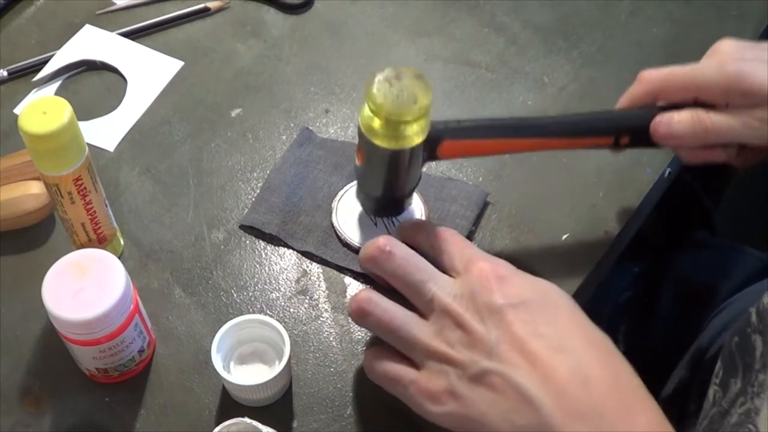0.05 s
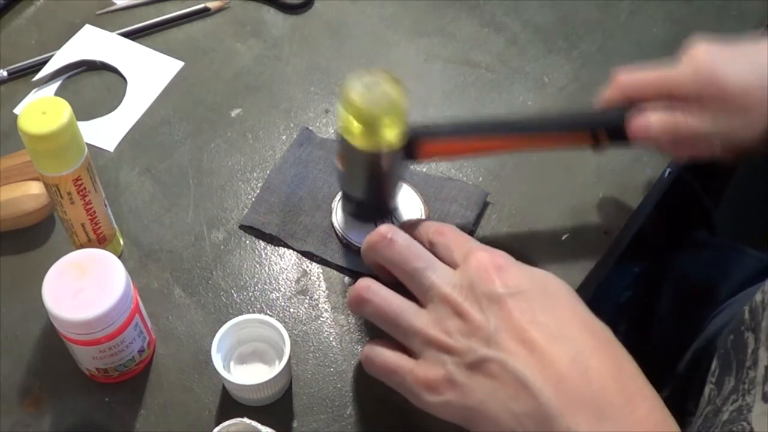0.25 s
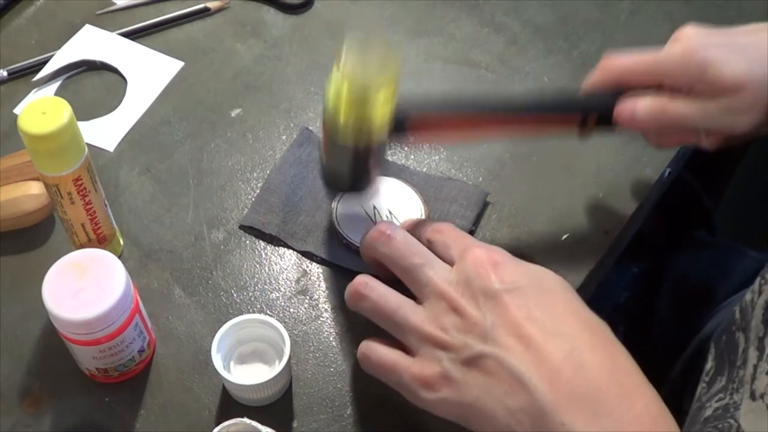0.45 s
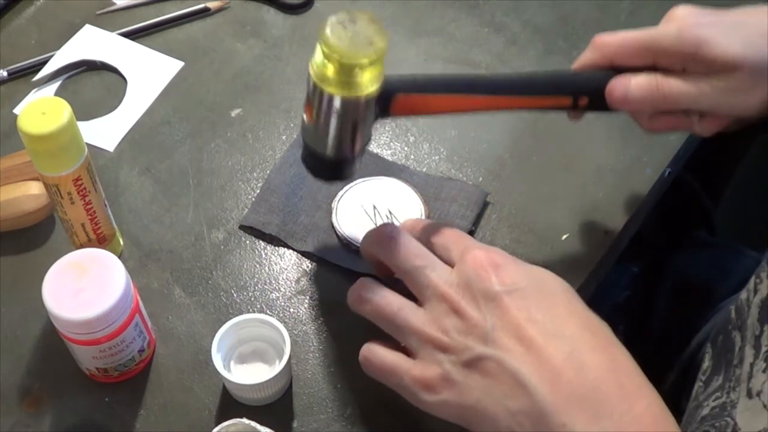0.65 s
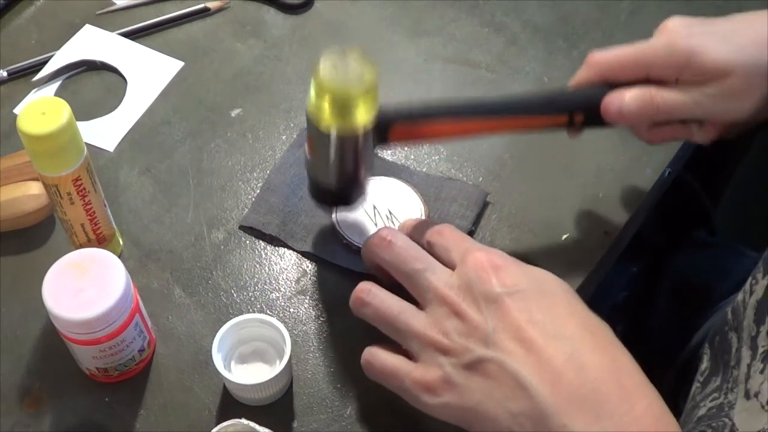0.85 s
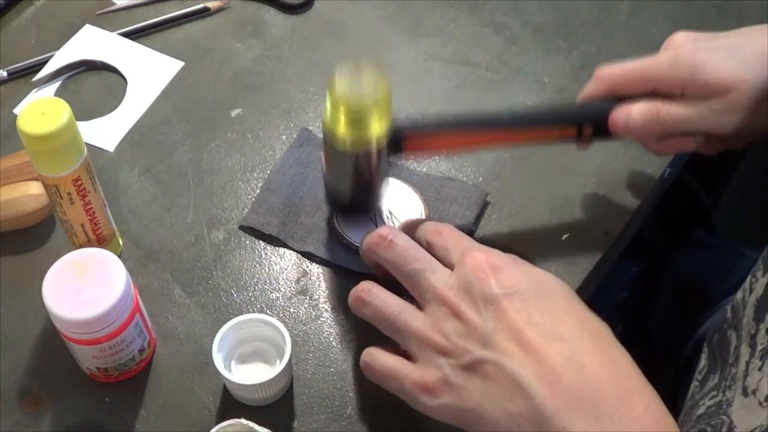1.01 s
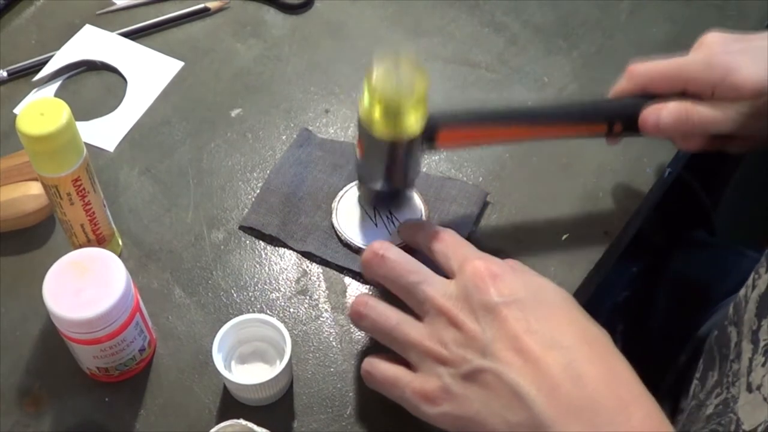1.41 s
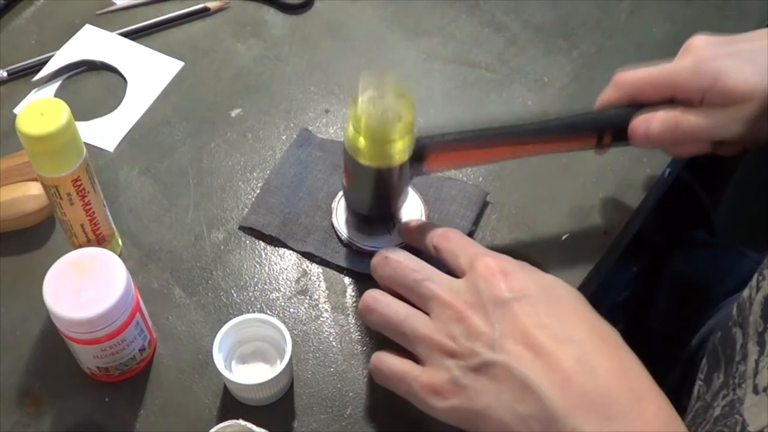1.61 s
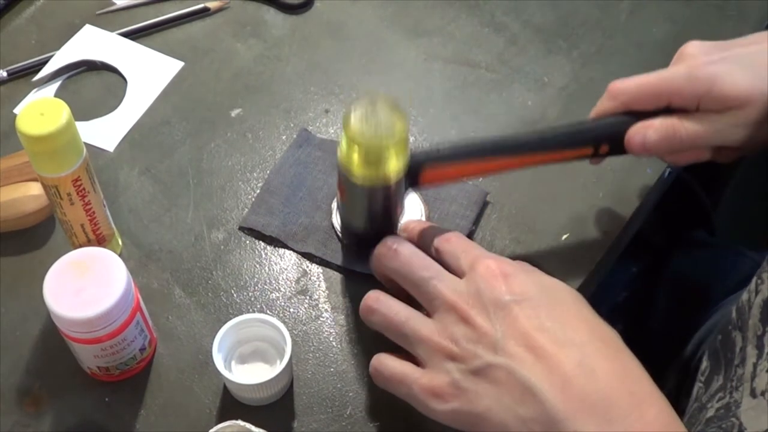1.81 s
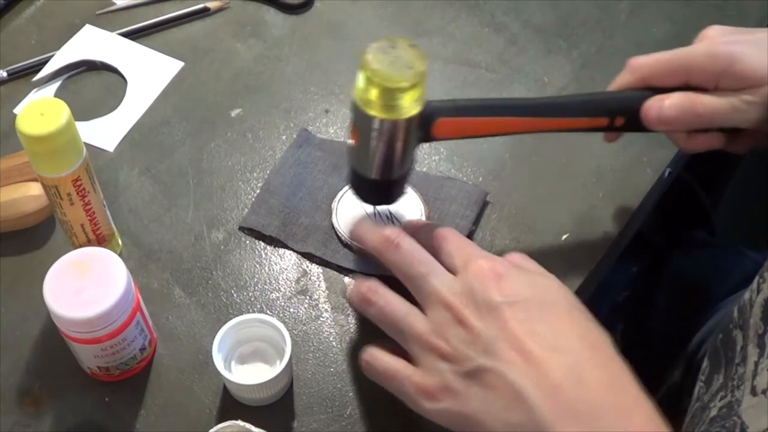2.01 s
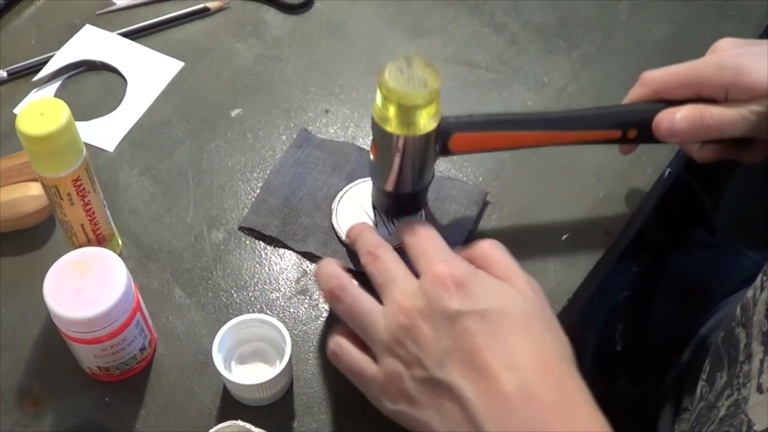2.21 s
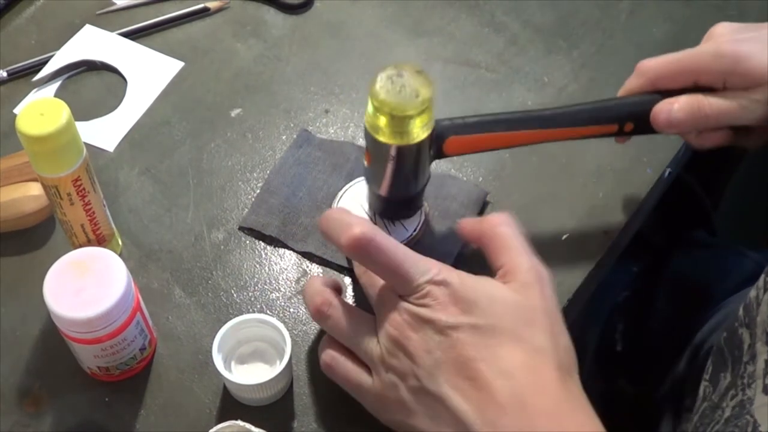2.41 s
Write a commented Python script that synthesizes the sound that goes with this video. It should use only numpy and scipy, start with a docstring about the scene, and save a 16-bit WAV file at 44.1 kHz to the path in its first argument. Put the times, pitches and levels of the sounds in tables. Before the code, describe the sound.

A mallet hits a small piece on a cloth-padded table eight times, quickening slightly, each blow a short clack with a dull wooden thud. A softer knock follows. Heard close up in a small, quiet room.

```python
"""A plastic-faced mallet strikes a small stamp on a cloth pad eight times, then gives a softer knock.
Each blow is a contact click, a short clack and a boom of the table beneath, in a small bare room.
Fingers brush the cloth around the last knock; behind it all lie faint hiss and two far tones.
Heard on a camera's microphone pair: its limiter holds the first part of each blow level,
and its electronics add a thin whine."""
import sys
import numpy as np
from scipy import signal
from scipy.fft import irfft, next_fast_len
from scipy.io import wavfile
from scipy.ndimage import uniform_filter1d, minimum_filter1d

SR = 44100
rng = np.random.default_rng(int(sys.argv[2]) if len(sys.argv) > 2 else 0)


def generate_wav(sig):
    """Save sig (samples, or channels by samples) to the path in sys.argv[1] as 16-bit PCM at SR."""
    pcm = np.round(np.clip(np.atleast_2d(sig).T, -1, 1) * 32767).astype(np.int16)
    wavfile.write(sys.argv[1], SR, pcm)


N = 112454

# how alike the two microphones hear the blows (frequency [Hz], correlation [clipped to 1 in use])
MIC_LIKENESS = [(25, 12.5), (70, 5), (160, 2.3), (300, 3.75), (640, 1.76), (1400, 1), (3100, 1.16),
                (7000, .78), (11000, 1), (13000, 2)]
# colour of rubbed cloth (frequency [Hz], relative level [dB])
CLOTH_COLOUR = [(1000, 0), (3000, -2), (7000, 2), (10000, -6), (13500, -13), (16000, -30)]
PAD_RISE_S = .0015  # onset of the sounds made as the pad bottoms out


def mallet():
    """Blows through stamp and pad into the table: one shared low response, a treble that varies."""
    # the blows (time [s], force [dB], treble [dB], click [dB], click pitch [Hz], boom [dB], thump [dB],
    # clack [dB], scuff [dB], knock [dB], stamp resonance [Hz], its lift [dB])
    blows = [(0.2299, -2.5, 0.5, -12, 6200, -0.5, -2.5, 1.5, 5, -28, 2340, 1),
             (0.5107, -2.5, 0, 2, 3570, -1, -3, 4, -11, 5.5, 3060, 1.5),
             (0.7728, -0.5, -3, -9, 6000, -3.5, 4, -20, 4.5, 5.5, 930, -0.5),
             (1.0174, -3.5, 0.5, -2, 6860, -3, -5, -7, -4, 0.5, 2510, 1),
             (1.2302, -4.5, -2, 10, 5070, -1.5, -3, 1.5, -8, 4, 1190, 1),
             (1.4408, -3.5, -2.5, 6.5, 4280, -3, 2, -17, -11, 7.5, 1610, 1.5),
             (1.6422, -3.5, -4, -10, 4800, -2.5, -2, 3, -23, -12, 1360, 2),
             (1.8299, -3.5, -3, -8, 7000, -2, 3.5, 5, -2, 6, 1800, 0),
             (2.2363, -12, -12, -14, 5000, -9, 10, 11.5, 8, -3, 2810, 0.5)]
    # modes of the table (frequency [Hz], level [dB], t60 [s])
    table_modes = [(153.54, 5, .25), (188.4, 1.5, 0.21), (237.46, -1, 0.24), (239.9, -5.5, 0.087),
                   (272.4, -18, 0.58), (442.5, -12, .3), (555, -9.5, 0.16), (588, -12, 0.28),
                   (670.4, -17.5, 0.32), (798.7, -10, 0.23), (1017, -21.5, 0.44), (1140, -10, 0.23),
                   (1264, -15, 0.22), (1421, -27, 0.12)]
    # standing waves of the room (frequency [Hz], level [dB], t60 [s])
    room_modes = [(64.8, -11, 0.28), (105.1, -9.5, 0.34), (216, -12, 0.45), (296.8, -17.5, 0.42),
                  (314.3, -19, 0.47), (359.4, -17, 0.46), (475.6, -8, 0.24), (638, -26, 0.27)]
    # loose things on the table that ring on faintly (frequency [Hz], level [dB], t60 [s])
    loose_modes = [(200, -41, 2.2), (1168, -49.5, 2.1), (1840, -52, 2.1)]
    # colour of the clack (frequency [Hz], relative level [dB])
    clack_colour = [(30, -30), (120, -12), (280, -2.5), (500, 18.5), (900, 7.5), (1600, 1), (3000, -20.5),
                    (7000, -23.5), (15000, -50)]
    alike_hz, treble_hz = 840, 1250  # blows sound alike below the first, vary in strength above the second
    ring_s, stamp_octaves, spread_db_per_octave = .7, .53, 1.3
    t = np.arange(next_fast_len(round(ring_s * SR))) / SR
    hz = np.fft.rfftfreq(len(t), 1 / SR)
    alike = 1 / (1 + (hz / alike_hz) ** 2)
    treble = 1 - 1 / (1 + (hz / treble_hz) ** 2)
    shared = [random_spectra(len(hz)), random_spectra(len(hz))]
    low_cut = signal.butter(2, 73, "high", fs=SR)  # cuts the deep bass from the thump and boom
    push, *modes = signal.lfilter(*low_cut, [thump(t)] + [boom(t, [mode]) for mode in table_modes])
    spread_db = spread_db_per_octave * np.log2(np.array(table_modes)[:, 0] / table_modes[0][0])
    end_fade = 1 - (t / t[-1]) ** 10
    ringing = (boom(t, room_modes) + boom(t, loose_modes)) * end_fade
    out = np.zeros((2, N))
    for (s, force_db, treble_db, click_db, click_hz, boom_db, thump_db,
         clack_db, scuff_db, knock_db, stamp_hz, stamp_db) in blows:
        near, far = [np.sqrt(alike) * z + np.sqrt(1 - alike) * random_spectra(len(hz)) for z in shared]
        # the stamp's resonance shifts with where it is struck
        resonance = np.exp(-.5 * (np.log2((hz + 1) / stamp_hz) / stamp_octaves) ** 2)
        gain = mic_pair(hz) * amp(treble_db * treble + stamp_db * resonance)
        table = np.tensordot(amp(spread_db * rng.uniform(-1, 1, len(table_modes))), modes, 1)
        clack = amp(clack_db - 11.5) * pad_burst(t, near, gain, clack_colour, t60=.034)
        rub = pad_burst(t, random_spectra(len(hz)), mic_pair(hz), CLOTH_COLOUR, t60=.12)
        scuff = amp(scuff_db - 40) * rub
        body = amp(boom_db) * table + amp(thump_db) * push + amp(knock_db) * knock(t)
        crunch = amp(stamp_db) * crackle(t, gain)
        add(out, s, amp(force_db) * (crunch + clack + scuff + body + ringing + room(t, far, gain)))
        add(out, s - .00014, amp(click_db) * click(t, click_hz))  # contact comes just ahead
    return out


def click(t, hz, decay_s=.00013, echo_s=.0063, echo_db=-7):
    """The mallet's face meets the stamp: a tiny gritty snap and its echo off a nearby surface."""
    band = signal.butter(2, [hz / 2, min(2 * hz, .3 * SR)], "band", fs=SR, output="sos")
    grit = signal.sosfilt(band, rng.standard_normal(len(t)))
    snap = np.sin(2 * np.pi * hz * t) * np.exp(-t / decay_s) + .41 * grit * np.exp(-t / (10 * decay_s))
    echo = amp(echo_db) * np.roll(snap, round(echo_s * SR))
    return amp(-30.5) * (np.array([snap, snap]) + echo)


def crackle(t, gain, decay_s=.005):
    """The stamp crunches at first contact."""
    # colour of the crunch (frequency [Hz], relative level [dB])
    colour = [(200, -31), (1000, 1), (1900, 3.5), (3600, -0.5), (7000, -12), (15000, -26.5)]
    noise = stereo_noise(random_spectra(len(t) // 2 + 1), colour, MIC_LIKENESS, gain, len(t))
    return amp(-30) * np.exp(-t / decay_s) * noise


def pad_burst(t, spectra, gain, colour, t60, delay_s=.0042):
    """A brief rattle or rub that starts as the pad bottoms out."""
    age = np.maximum(t - delay_s, 0)
    envelope = amp(-60 * age / t60) * (1 - np.exp(-age / PAD_RISE_S))
    return envelope * stereo_noise(spectra, colour, MIC_LIKENESS, gain, len(t))


def knock(t, hz=520, t60=.042, delay_s=.00529):
    """The short woody note of the stamp as the pad bottoms out."""
    age = np.maximum(t - delay_s, 0)
    return amp(-14 - 60 * age / t60) * (1 - np.exp(-age / PAD_RISE_S)) * stereo_tone(age, hz)


def thump(t, hz=161.4, peak_s=.0023):
    """The padded blow pushes the table top down and lets it spring back."""
    return amp(-19) * t / peak_s * np.exp(1 - t / peak_s) * stereo_tone(t, hz)


def boom(t, modes, swell_cycles=4.8):
    """Modes set ringing by a blow swell over a few cycles and die away."""
    return amp(-10) * sum(amp(db - 60 * t / t60) * (1 - np.exp(-t * hz / swell_cycles))
                          * stereo_tone(t, hz) for hz, db, t60 in modes)


def room(t, spectra, gain, delay_s=.0035, rise_s=.0038):
    """Dense reflections off the bare walls, each band dying at its own speed."""
    # colour of the room's answer (frequency [Hz], relative level [dB])
    colour = [(25, -44), (60, -9), (130, -2), (230, 7.5), (380, -4), (600, -0.5), (950, -7), (1500, -7.5),
              (2400, -15), (4500, -28), (7500, -31.5), (11000, -42), (15000, -55)]
    # reverberation time (frequency [Hz], t60 [s])
    decay_times = [(60, 0.38), (200, 0.25), (350, 0.34), (700, 0.33), (1500, 0.33), (4000, .33), (8000, .3),
                   (14000, 0.3)]
    noise = stereo_noise(spectra, colour, MIC_LIKENESS, gain, len(t))
    hz, age, frames = signal.stft(noise, SR, nperseg=512)
    decay = amp(-60 * age / value_at(decay_times, hz)[:, None])
    tail = signal.istft(frames * decay, SR, nperseg=512)[1][:, :len(t)]
    onset = 1 - np.exp(-np.maximum(t - delay_s, 0) / rise_s)
    return amp(-12.5) * onset * tail


def fingers(peak_s=.006):
    """Fingertips brush the cloth faintly as the hand shifts its hold."""
    # touches on the pad (time [s], level [dB])
    brushes = [(2.157, -80), (2.425, -69)]
    t, out = np.arange(8192) / SR, np.zeros((2, N))
    envelope = t / peak_s * np.exp(1 - t / peak_s)
    for s, db in brushes:
        rub = stereo_noise(random_spectra(len(t) // 2 + 1), CLOTH_COLOUR, MIC_LIKENESS, amp(db), len(t))
        add(out, s, envelope * rub)
    return out


def background():
    """Still room air, with two faint far tones that swell and fade."""
    # colour of the hiss (frequency [Hz], relative level [dB])
    colour = [(25, -18), (60, -11.5), (120, -12.5), (300, -14.5), (600, -12), (1200, -15), (2500, -19),
              (6000, -24.5), (14000, -30.5)]
    # how alike the two microphones hear it (frequency [Hz], correlation [0 to 1])
    likeness = [(60, 1), (240, 0.72), (1000, 0.29), (4000, 0.3), (13000, 1)]
    # tones in the distance (start [s], length [s], frequency [Hz], level [dB])
    far_tones = [(0.032, 0.13, 549, -70.5), (2.457, 0.1, 1100, -64)]
    air = stereo_noise(random_spectra(N // 2 + 1), colour, likeness, amp(-66.5), N)
    for s, length, hz, db in far_tones:
        t = np.arange(0, length, 1 / SR)
        tone = np.sqrt(2) * amp(db) * np.sin(np.pi * t / length) * np.sin(2 * np.pi * hz * t)
        add(air, s, np.array([tone, tone]))
    return air


def mic_pair(hz):
    """Gain and phase with which a blow reaches the left and right microphones."""
    # balance of the pair (frequency [Hz], left minus right [dB])
    balance = [(30, -60), (65, -1), (170, 1.6), (450, 1.1), (1300, 0.5), (8000, 0.8), (14000, -1)]
    # phase between the pair (frequency [Hz], left lead [rad])
    lead = [(30, 0), (150, 0.88), (260, 1.03), (520, 1.36), (1120, 0.88), (3400, 0.8), (9000, .02)]
    half = amp(value_at(balance, hz) / 2) * np.exp(.5j * value_at(lead, hz))
    return np.array([half, 1 / half])


def stereo_tone(t, hz):
    """One frequency as the two microphones hear it."""
    return (1j * mic_pair(hz)[:, None] * np.exp(2j * np.pi * hz * t)).real


def stereo_noise(spectra, colour, likeness, gain, size):
    """Random spectra to stereo noise of a given colour, of rms 1 before the gain."""
    hz = np.fft.rfftfreq(size, 1 / SR)
    correlation = np.clip(value_at(likeness, hz), -1, 1)
    shape = amp(value_at(colour, hz))
    mid = np.sqrt((1 + correlation) / 2) * spectra[0]
    side = np.sqrt((1 - correlation) / 2) * spectra[1]
    noise = irfft(np.array([mid + side, mid - side]) * shape * gain, size)
    return noise * size / (2 * np.linalg.norm(shape))


def random_spectra(size):
    """Two unrelated random spectra."""
    return rng.standard_normal((2, size)) + 1j * rng.standard_normal((2, size))


def amp(db):
    """Decibels to gain."""
    return 10 ** (np.asarray(db) / 20)


def value_at(points, hz):
    """A curve's value on a log-frequency axis."""
    f, value = np.transpose(points)
    return np.interp(np.log(hz + 1), np.log(f), value)


def add(mix, s, sound):
    """Mixes a stereo sound in at a time."""
    part = mix[:, round(s * SR):][:, :sound.shape[1]]
    part += sound[:, :part.shape[1]]


def scene():
    """The mallet and the steadying hand in the quiet room."""
    return mallet() + fingers() + background()


def record(dry):
    """At the camera: a quick limiter, its own electrical whine, then the band limit."""
    limit_db, attack_s, recover_db_per_s = -15.5, .0021, 175
    whine_hz, whine_db, edge_hz = 15625, -73, 16300
    t, span = np.arange(N) / SR, round(attack_s * SR)
    over_db = np.maximum(20 * np.log10(abs(dry).max(0) + 1e-9) - limit_db, 0)
    held_db = np.maximum.accumulate(over_db + recover_db_per_s * t) - recover_db_per_s * t
    limited = dry * amp(uniform_filter1d(minimum_filter1d(-held_db, span), span))
    whine = np.sqrt(2) * amp(whine_db) * np.sin(2 * np.pi * whine_hz * t)
    low_pass = signal.firwin(511, edge_hz, window=("kaiser", 9), fs=SR)
    return signal.oaconvolve(limited + whine, low_pass[None], "same")


dry = scene()
out = record(dry)
generate_wav(out)
```